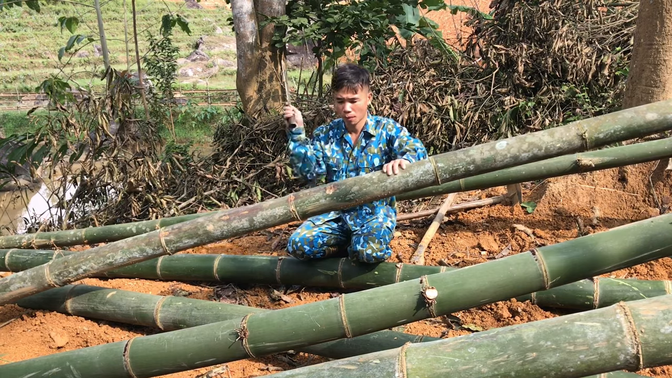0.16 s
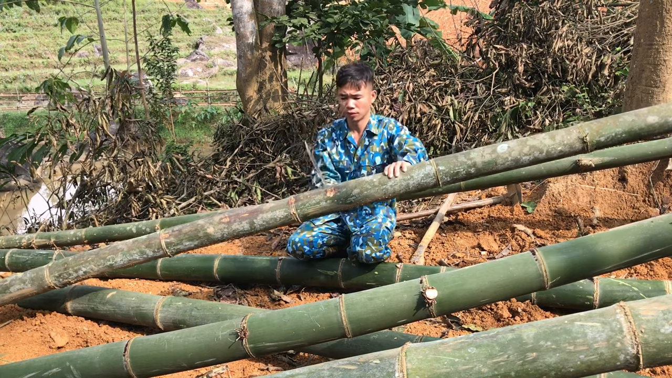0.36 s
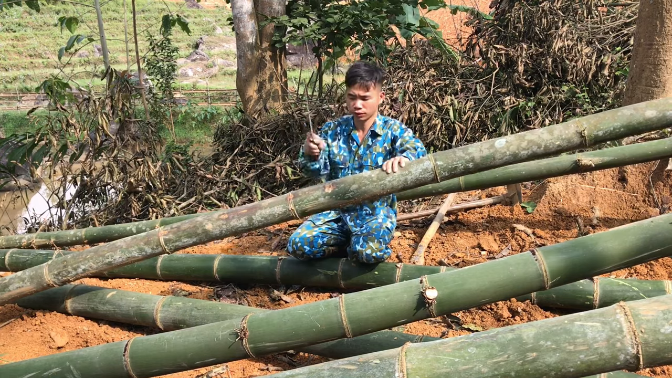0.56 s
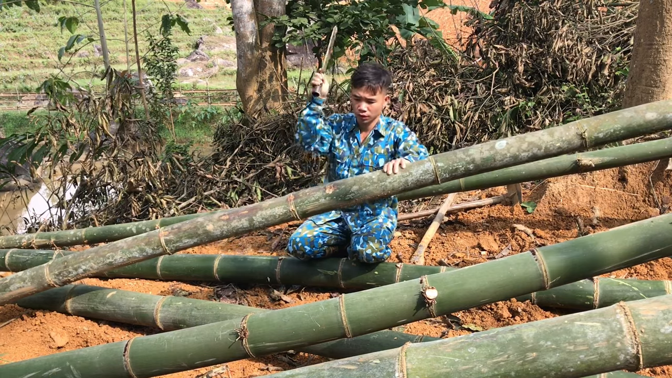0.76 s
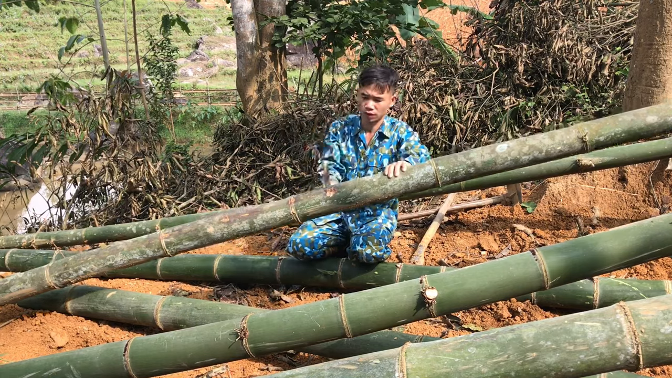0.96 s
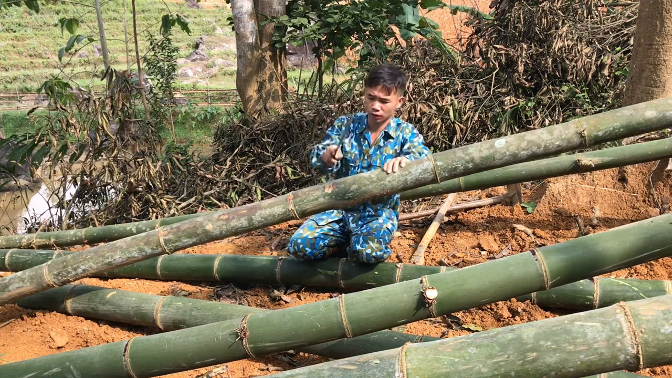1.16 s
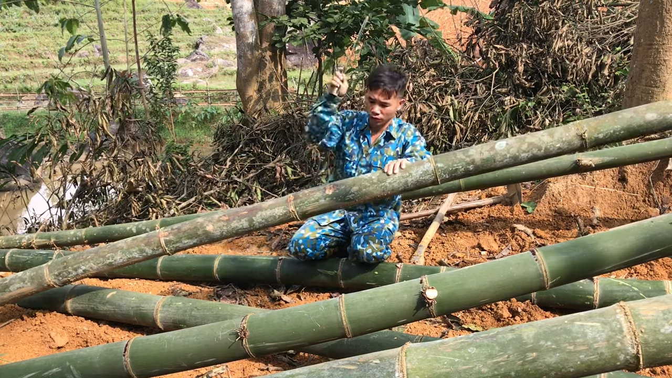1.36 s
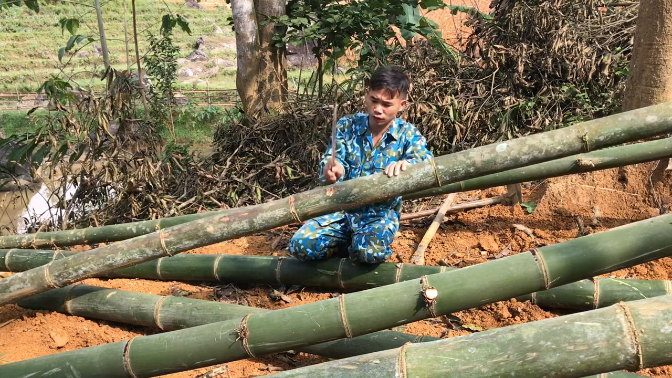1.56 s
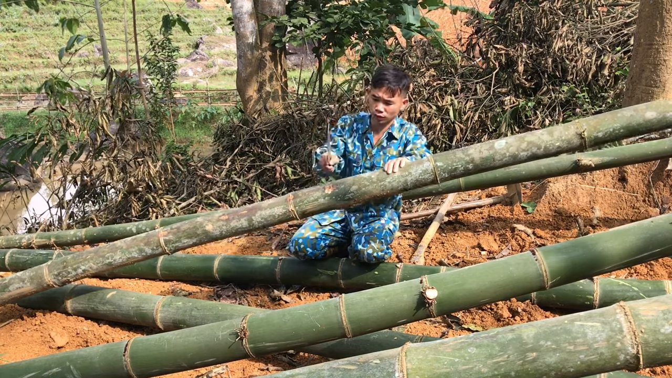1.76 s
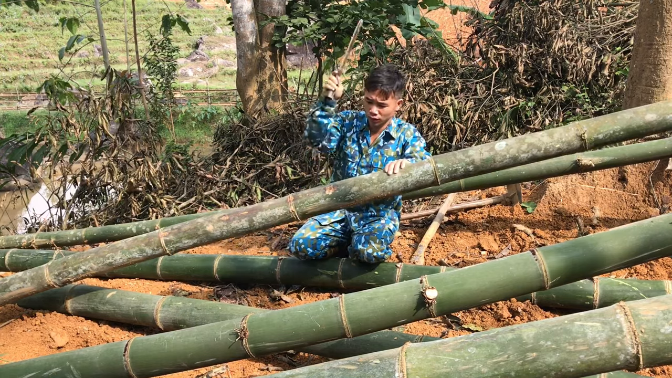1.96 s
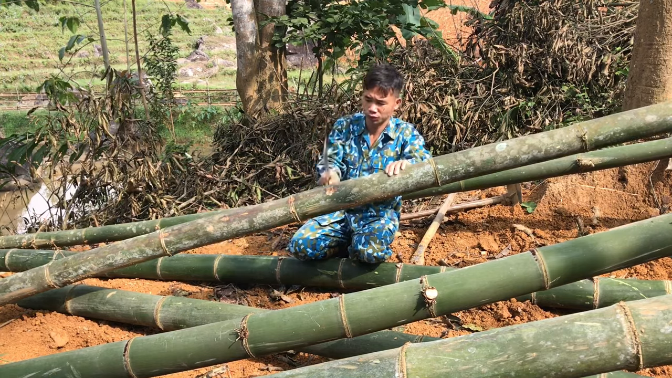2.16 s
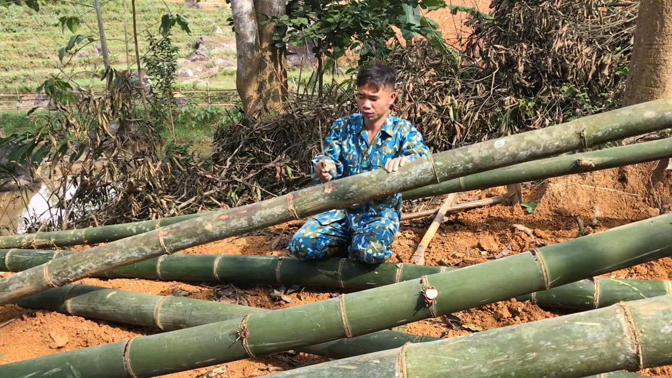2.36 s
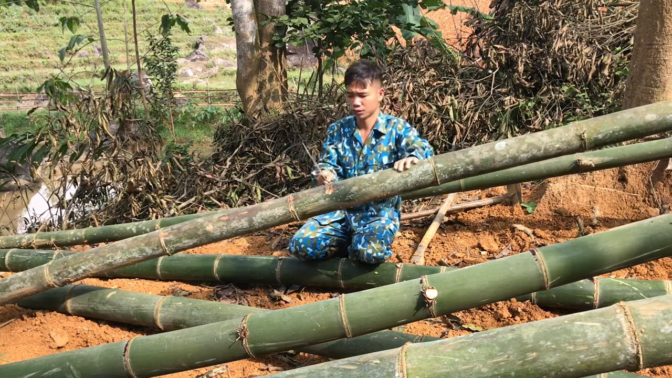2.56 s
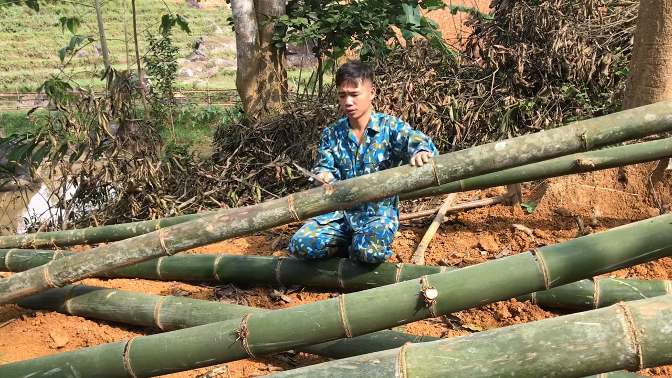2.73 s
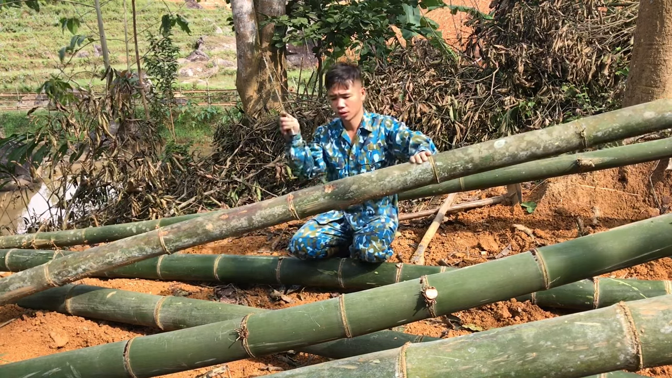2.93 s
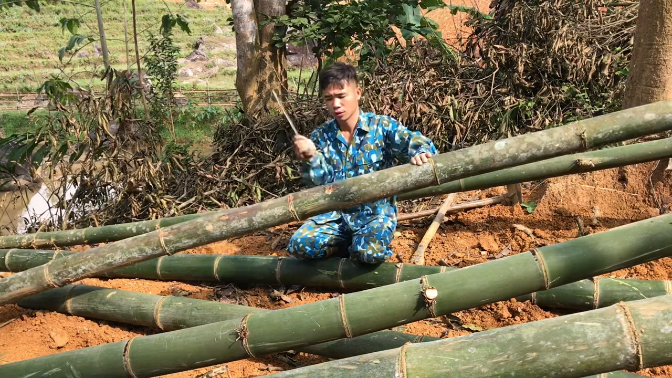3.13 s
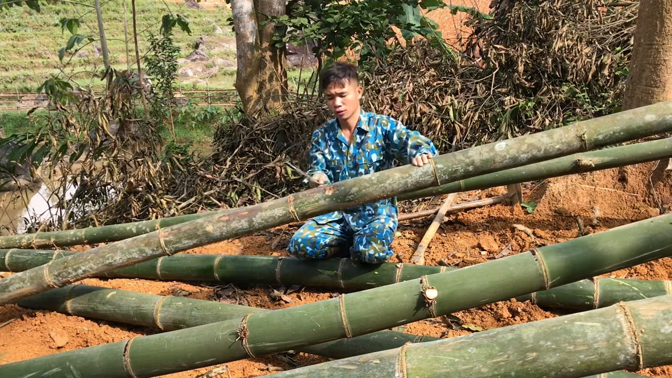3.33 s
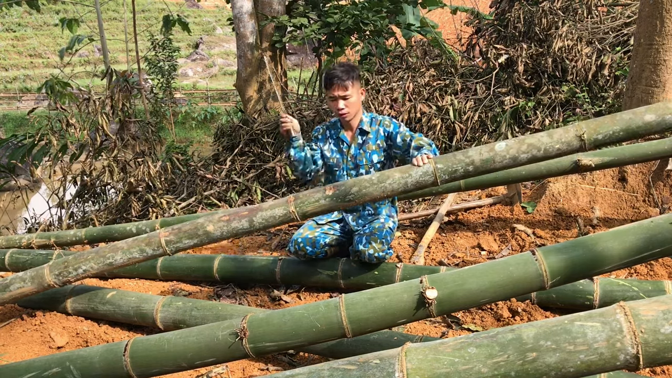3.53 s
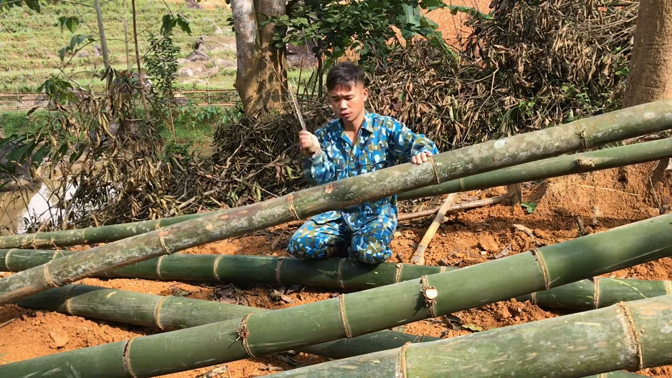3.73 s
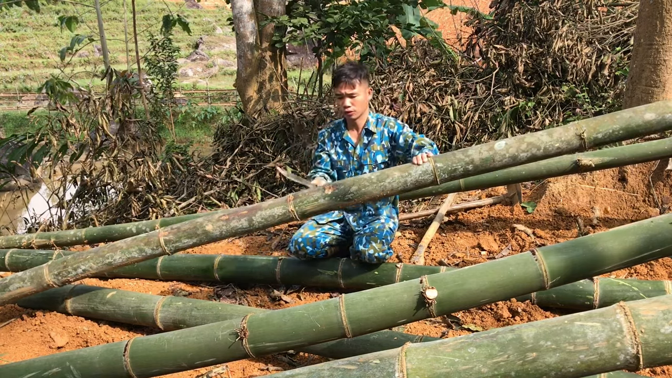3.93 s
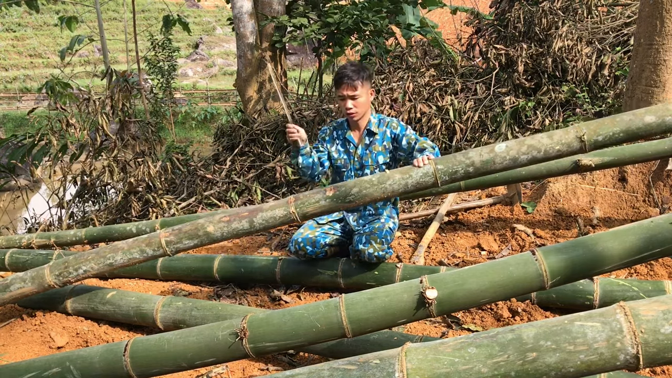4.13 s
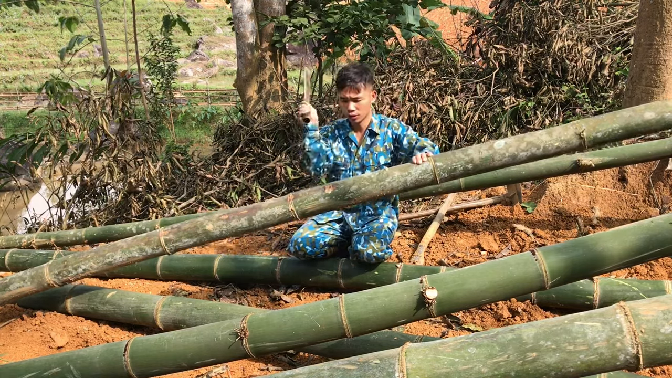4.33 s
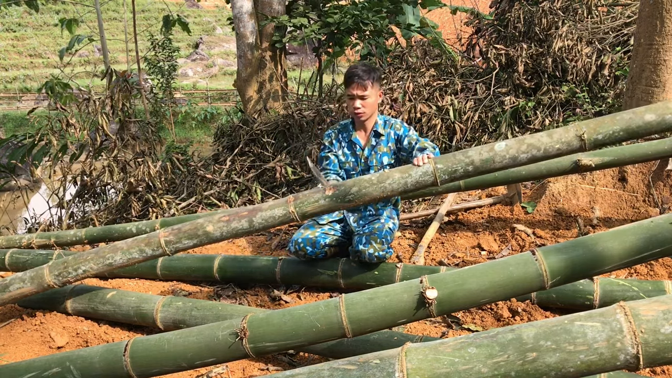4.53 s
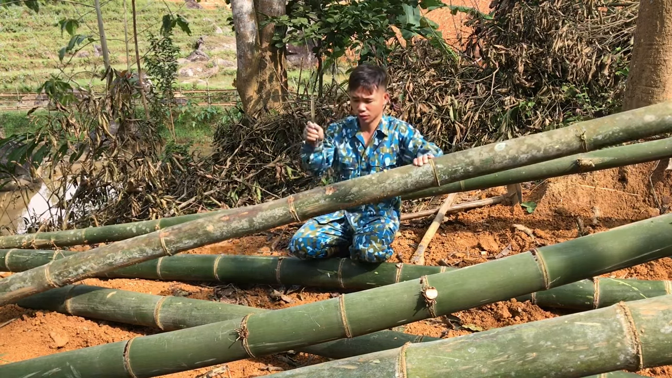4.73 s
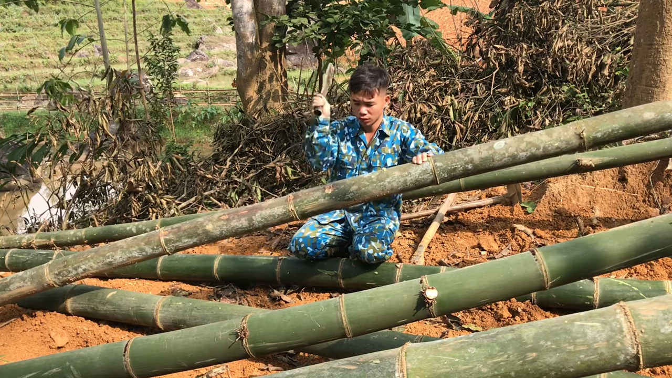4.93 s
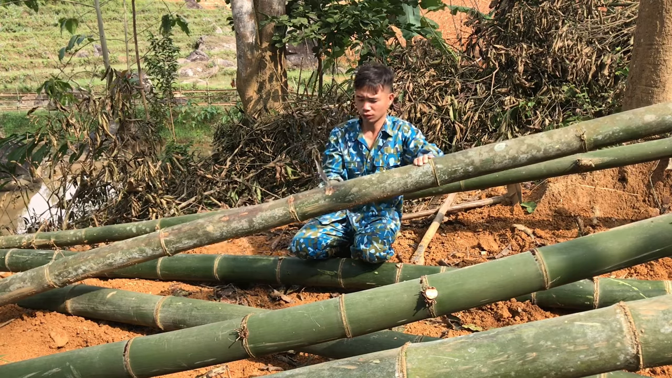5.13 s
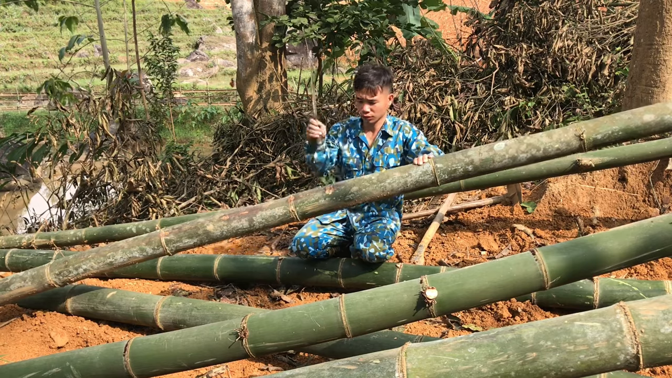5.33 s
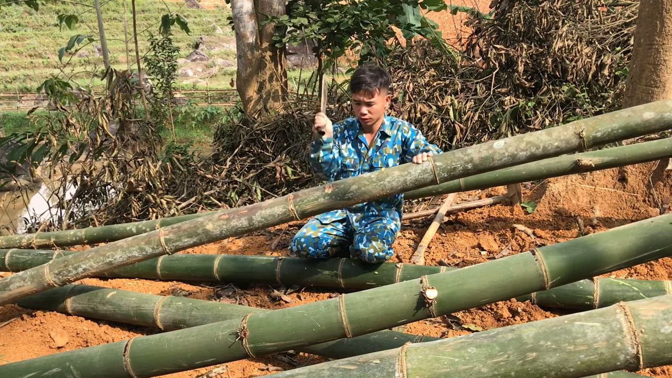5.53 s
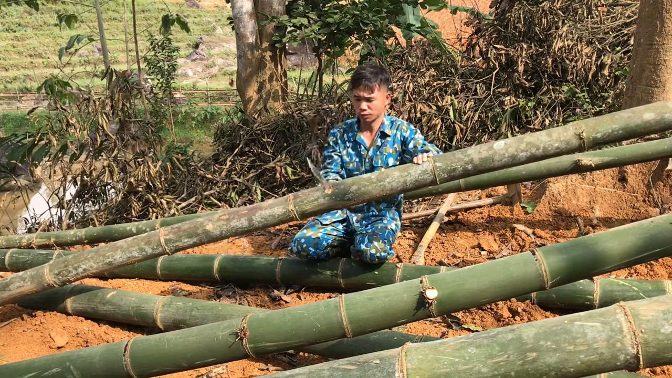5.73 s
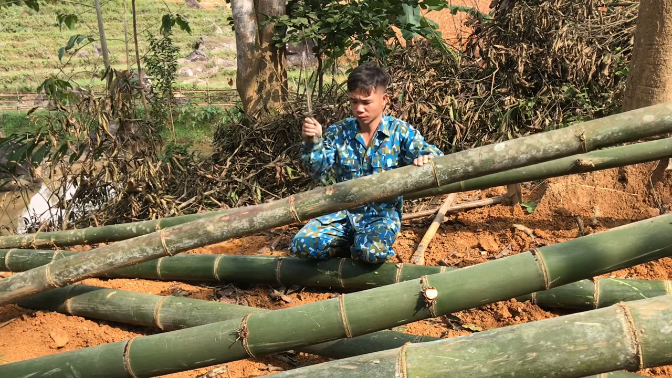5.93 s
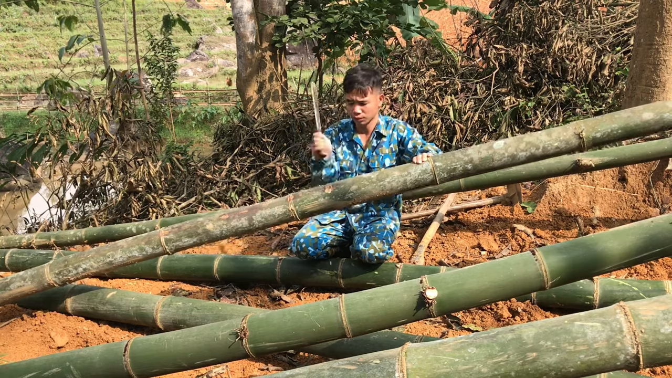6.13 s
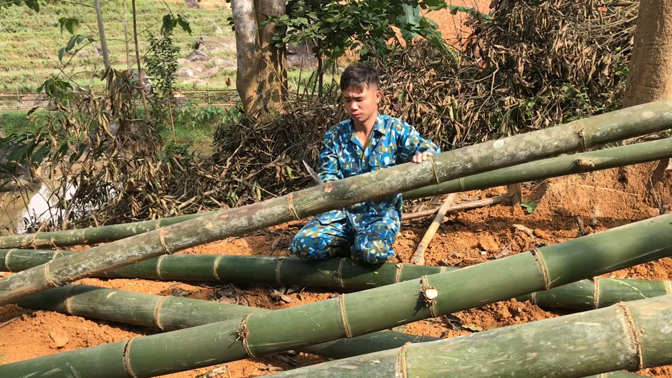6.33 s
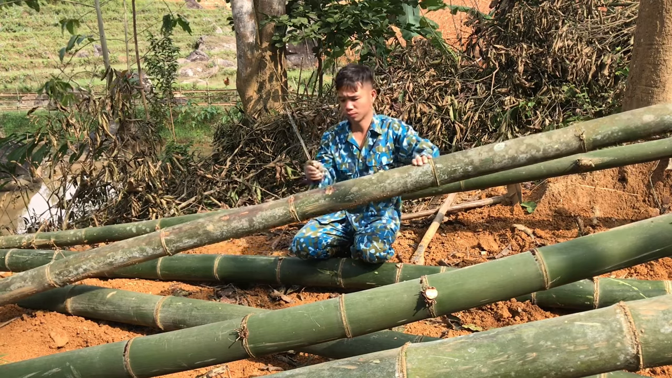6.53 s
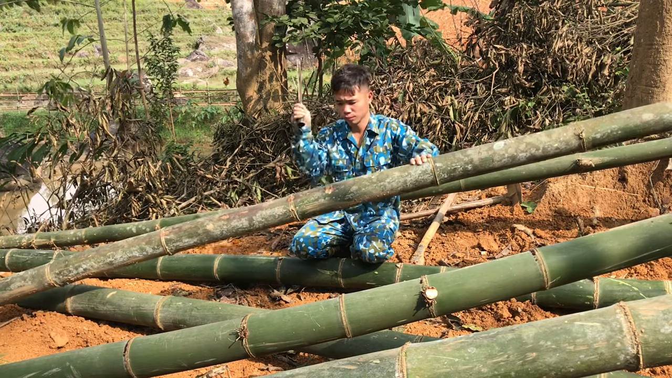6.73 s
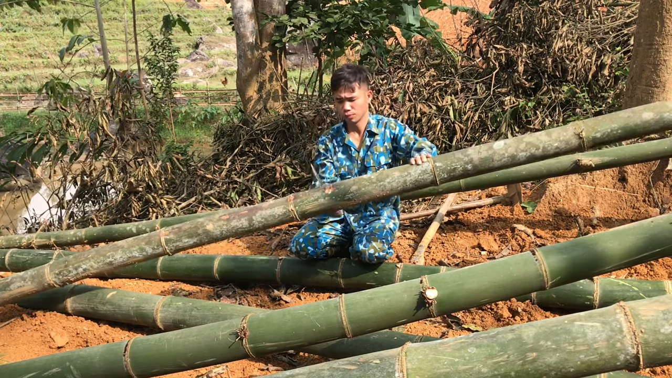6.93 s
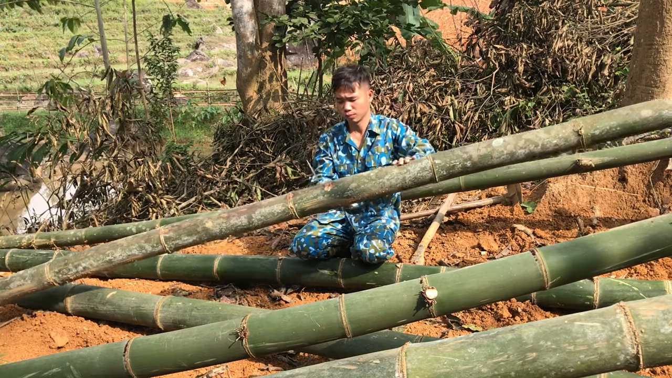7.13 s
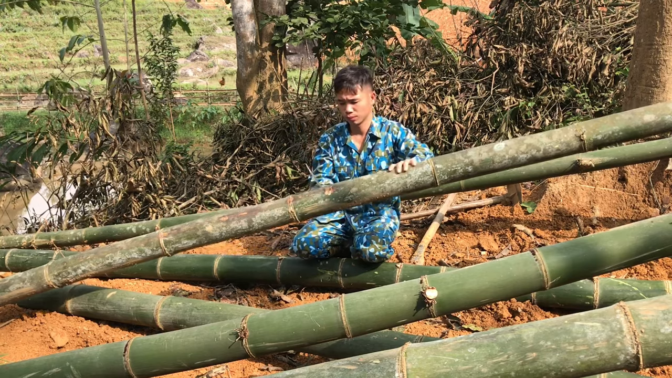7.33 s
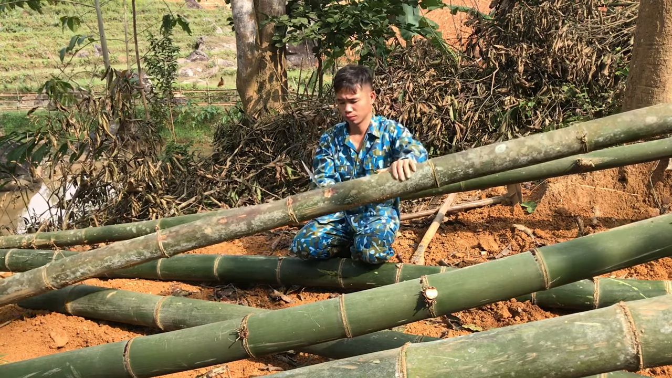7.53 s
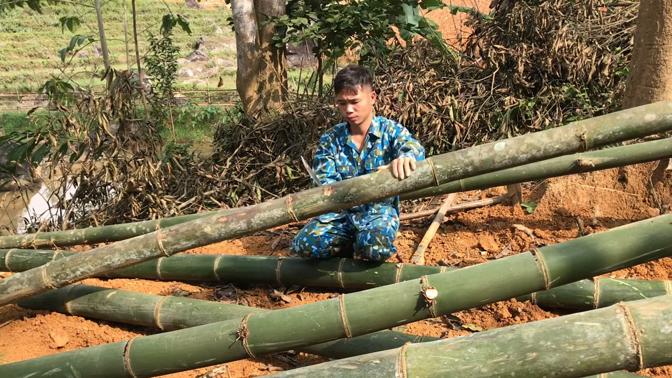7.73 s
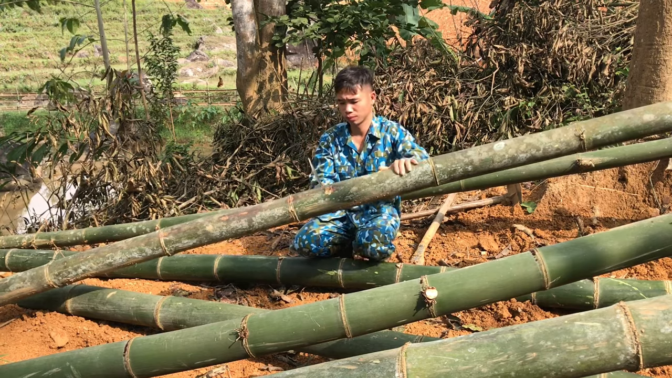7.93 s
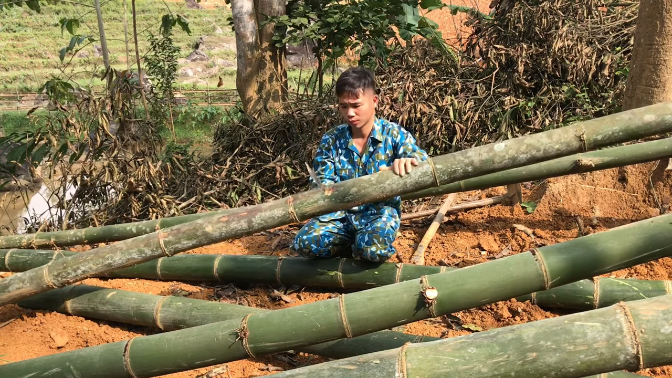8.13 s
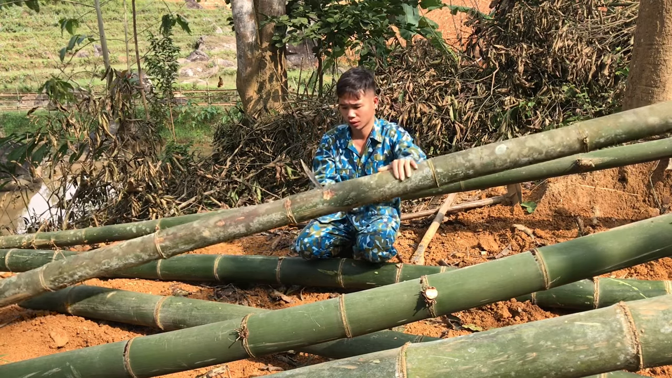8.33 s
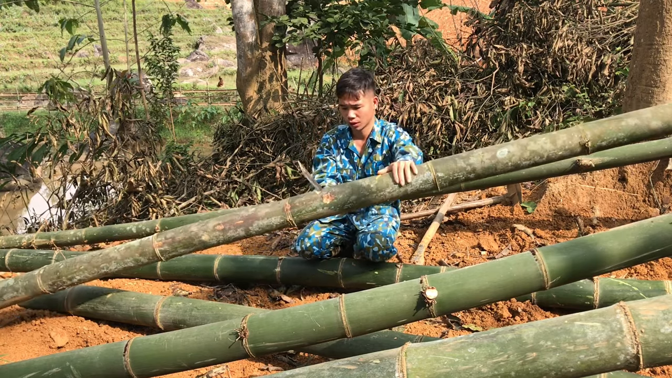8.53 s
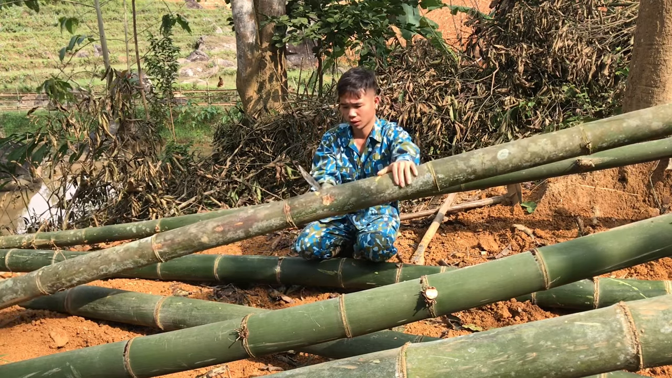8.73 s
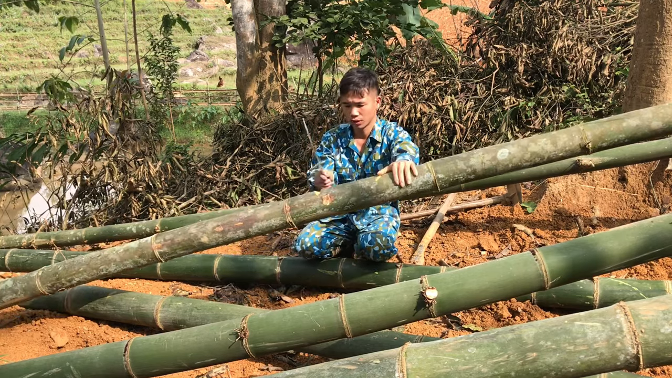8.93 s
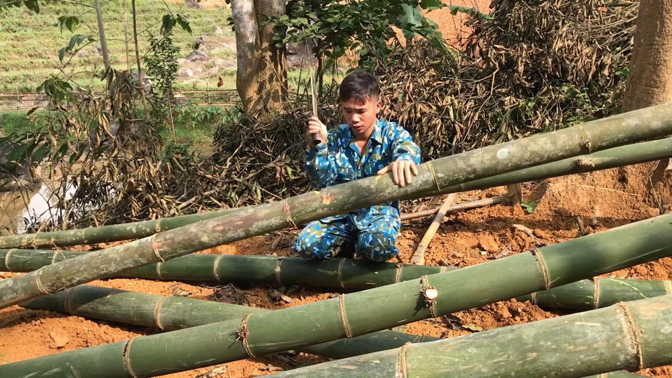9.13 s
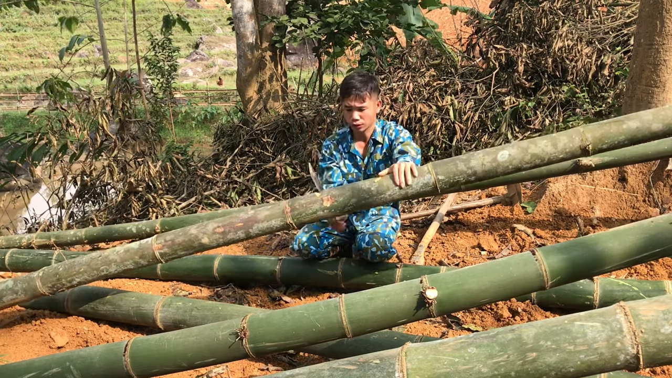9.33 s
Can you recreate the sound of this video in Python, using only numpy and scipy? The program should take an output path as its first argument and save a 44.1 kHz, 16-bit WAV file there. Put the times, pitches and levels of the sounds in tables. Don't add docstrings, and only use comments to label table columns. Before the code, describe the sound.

Loud, hollow blade blows on green bamboo, about two every second and a quarter, echo off a pile and hillsides; a quiet lull precedes one last chop.

```python
import sys
import numpy as np
from scipy import signal
from scipy.fft import rfft, irfft
from scipy.io import wavfile
from scipy.ndimage import uniform_filter1d, minimum_filter1d

SR = 44100
rng = np.random.default_rng(int(sys.argv[2]) if len(sys.argv) > 2 else 0)


def int16_out(signal):
    q = np.round(np.clip(np.atleast_2d(signal).T, -1, 1) * 32767)
    wavfile.write(sys.argv[1], SR, q.astype(np.int16))


def boost(x):
    u = np.asarray(x, float) / 20
    return 10 ** u


N = 413658
LEAD = SR // 2

# f/Hz, level/dB, t60/s
POLE = [(69.4, -27.5, 0.45), (120, -11.5, 0.12), (162, -23.5, 0.16), (236, -1.5, 0.32), (370, -2.5, 0.2),
        (432, -3.5, 0.2), (507, -1, 0.072), (569, -5.5, 0.12), (666, -10.5, 0.053), (682.2, 4, .12),
        (730.4, -9.5, 0.36), (804, -5, 0.12), (911, -6, 0.17), (980, 5.5, 0.044), (1128, -13, 0.18),
        (1088, 6.5, 0.033), (1226, 4, 0.05), (1321, 1, 0.073), (1420, -5, 0.089), (1538, -11.5, .09),
        (1626, -12.5, 0.1), (1654, -17.5, .09), (1768, -18.5, 0.064)]
# f/Hz, t60/s
PILE = [(100, 0.18), (400, 0.23), (1300, 0.19), (3000, 0.34), (6000, 0.14), (11000, 0.23), (16000, .15)]


def evened(x):
    return x / np.sqrt(np.mean(x ** 2) + 1e-20)


def read(points, hz):
    f, value = np.transpose(points)
    return np.interp(np.log(hz + 1), np.log(f + 1), value)


def add(mix, s, sound):
    part = mix[LEAD + round(s * SR):][:len(sound)]
    part += sound[:len(part)]


def band(x, lo_hz, hi_hz):
    edges_hz = [lo_hz, min(hi_hz, SR / 2 - 500)]
    return signal.sosfilt(signal.butter(2, edges_hz, "band", fs=SR, output="sos"), x)


def high_pass(x, hz):
    return signal.sosfilt(signal.butter(3, hz, "high", fs=SR, output="sos"), x)


def bump(hz, centre_hz, octaves):
    return np.exp(-.5 * (np.log2(hz / centre_hz) / octaves) ** 2)


def ring(modes, t, longer, colour_db=0):
    hz, db, t60 = np.transpose(modes)[:, :, None]
    level = boost(db + colour_db - 60 * t / (t60 * longer))
    return (level * np.sin(2 * np.pi * hz * t)).sum(0)


def burst(shape):
    x = rng.standard_normal(len(shape)) * shape
    for _ in range(6):
        spectrum = rfft(x)
        x = irfft(spectrum / (abs(spectrum) + 1e-12), len(x))
        x = x * shape / np.sqrt(uniform_filter1d(x ** 2, size=31) + 1e-9)
    return x / np.linalg.norm(x)


def space(decay, start_s, rise_s, colour=((1, 0), (2, 0)), size=SR // 2):
    hz, t, z = signal.stft(rng.standard_normal(size), SR, nperseg=256)
    age = np.maximum(t - start_s, 0)
    level_db = read(colour, hz)[:, None] - 60 * age / read(decay, hz)[:, None]
    z = z * boost(level_db) * (1 - np.exp(-age / rise_s))
    tail = signal.istft(z, SR, nperseg=256)[1]
    return tail / np.linalg.norm(tail)


def stirred(strength_db, spot, notch, thud_hz):
    # f/Hz, level/dB
    families = [(228, -23), (385, -21.5), (540, -18), (685, -10.5), (940, -16), (1100, -19), (1345, -13),
                (1680, -20)]
    joint_hz, joint_octaves = 682, .14
    hz = np.transpose(POLE)[0]
    tone_db, octave_db = 20 * np.log10(abs(np.sin(np.pi * spot * np.arange(1, 3))) + .05)
    vent_db = -18 * notch ** 2
    joint_db = (tone_db + vent_db) * bump(hz, joint_hz, joint_octaves)
    joint_db += octave_db * bump(hz, 2 * joint_hz, joint_octaves)
    if thud_hz:
        low_db = 17 * bump(hz, thud_hz, 0.45)
    else:
        low_db = 16.5 * notch * bump(hz, 399.2, 0.86)
    chance_db = 2.64 * rng.standard_normal(len(hz))
    colour_db = strength_db + read(families, hz) + joint_db + low_db + chance_db
    return colour_db[:, None], tone_db


def pole_ring(strength_db, colour_db, longer, wedge_s):
    # f/Hz, level/dB, t60/s
    neighbour = [(1294, -25, .35), (1370, -27, 0.26), (690, -37.5, .4)]
    t = np.arange(SR // 2) / SR
    wedge = t[:1500] / wedge_s
    jolts = burst(wedge ** 2 * np.exp(-wedge))
    pole = signal.fftconvolve(boost(5) * ring(POLE, t[:SR // 4], 1.41 * longer, colour_db), jolts)
    pole = np.pad(pole, (0, SR // 4))
    pole *= np.exp(-(np.arange(len(pole)) / SR / 0.041) ** 2)
    return pole + signal.fftconvolve(boost(strength_db - 17) * ring(neighbour, t, 1), jolts)


def split_skin(crack_db, splinter_db, fibres_db, tear_db, longer):
    # f/Hz, level/dB, t60/s
    fibres = [(2260, -4.5, 0.023), (2495, -2, 0.095), (2440, -6.5, .05), (2466, -0.5, 0.059),
              (2740, 0, 0.1)]
    t = np.arange(SR // 2) / SR
    early = t[:1500]
    snap = np.exp(-early / .0011) + 0.14 * np.exp(-early / 0.02)
    splinter = np.exp(-early / 0.0057) + 0.23 * np.exp(-early / 0.0062)
    edge = signal.fftconvolve(boost(fibres_db - 10.5) * ring(fibres, t, .7 * longer), burst(snap))
    edge[:1500] += boost(crack_db + 22) * band(burst(snap), 8000, 18000)
    edge[:1500] += boost(splinter_db + 26.5) * band(burst(splinter), 1300, 7500)
    hiss = rng.standard_normal((2, len(t)))
    fading_db = -60 * t / .48
    edge[:len(t)] += boost(tear_db - 29.0 + fading_db) * band(hiss[0], 3200, 9800)
    edge[:len(t)] += boost(tear_db - 32.5 + 1.1 * fading_db) * band(hiss[1], 9000, 17000)
    return edge


def blade_ring(db):
    # f/Hz, level/dB, t60/s
    steel = [(3024, -3.5, 0.2), (3284, -3.5, .07), (3400, -11.5, 0.14)]
    t = np.arange(SR // 2) / SR
    ping = burst(np.exp(-t[:1500] / .002))
    return signal.fftconvolve(boost(db + 4.0) * ring(steel, t, .4 * 0.47), ping)


def pile_rattle(pole, edge, strength_db):
    rattle_db = 0.075 * min(strength_db + 16, 0)
    sent = boost(-10.5) * pole + boost(-11) * edge
    return boost(rattle_db) * signal.fftconvolve(sent, space(PILE, 0.00063, 0.00029))[:len(pole)]


def slope_echo(close):
    # f/Hz, t60/s
    slopes = [(100, 0.3), (400, 1), (1300, .9), (3000, 4.8), (6000, 0.27), (9000, 0.43), (12000, .3)]
    # f/Hz, level/dB
    slopes_colour = [(80, -4), (200, 5.5), (320, 15), (500, 10.5), (1300, 7.5), (2500, 3), (4500, 8),
                     (6000, 2), (9300, -6), (11000, -14), (16000, -24)]
    echoes = space(slopes, .165, .03, slopes_colour, size=SR)
    return boost(-42) * signal.fftconvolve(close, echoes)


def chop(s, strength_db, spot, crack_db, blade_db, thud_hz=0):
    bites = not thud_hz
    notch = bites * np.clip((s - 5.8) / 4.4, 0, 1)
    colour_db, tone_db = stirred(strength_db, spot, notch, thud_hz)
    full_splinter_db = -14
    if bites:
        longer, wedge_s = 0.47 + 0.14 * notch, .0033
        skin_db = -6.5 * np.exp(-s / 0.63)
        splinter_db = full_splinter_db + 0.16 * strength_db + skin_db
    else:
        longer, wedge_s = .55 * (400 / thud_hz) ** 2.2, 0.001
        splinter_db = crack_db - 8.5
    fibres_db = splinter_db - full_splinter_db - 12.5 + .7 * tone_db * bites
    tear_db = crack_db + 0.5 - 23.5 * notch
    pole = pole_ring(strength_db, colour_db, longer, wedge_s)
    edge = split_skin(crack_db, splinter_db, fibres_db, tear_db, longer)
    close = pole + edge + pile_rattle(pole, edge, strength_db)
    out = slope_echo(close)
    out[:len(close)] += close + blade_ring(blade_db)
    return s + 0.0006, out


def blows():
    # t/s, strength/dB, landing spot (0 node to 0.5 mid-joint), bite level/dB, blade ring level/dB
    swings = [(-.27, 5, 0.067, -8.5, -20), (0.3559, 1.5, 0.22, -11, -21), (.9802, 2.5, 0.039, -13.5, -12.5),
              (1.6057, -3.5, 0.31, -11, -14), (2.1966, 0, 0.25, -8.5, -10), (3.2066, 1, .09, -9, -15.5),
              (3.8125, 1.5, .13, -11.5, -3.5), (4.459, -0.5, 0.32, -13, -17), (5.0548, -2.5, .25, -9, -15),
              (5.6287, 0, 0.059, -6.5, -12.5), (6.2113, 0.5, .08, -14, -18.5),
              (6.9409, -1.5, 0.1, -15, -16.5), (9.3135, -5.5, 0.39, -14.5, -20)]
    mix = np.zeros(N + LEAD)
    for swing in swings:
        add(mix, *chop(*swing))
    return mix


def engine():
    # t/s, level/dB
    loudness = [
        (0, -70.5),
        (2.901, -69.5),
        (5.001, -67.5),
        (7.4, -67),
        (8.699, -66.5),
        (9.4, -69.5),
    ]
    s, db = np.transpose(loudness)
    t = np.arange(N) / SR
    firings_per_s, uneven_db = 25.3, 3.5
    fired = np.diff(np.floor(firings_per_s * t), prepend=0)
    pipe = [(52.92, -16.5, 0.34), (140, 0, 0.027), (200, -3.5, 0.023)]  # f/Hz, level/dB, t60/s
    thump = ring(pipe, t[:SR // 4], 0.87)
    puffs = signal.oaconvolve(fired * boost(uneven_db * rng.standard_normal(N)), thump)[:N]
    return boost(np.interp(t, s, db) + 0.5) * evened(puffs)


def air():
    # f/Hz, level/dB per Hz
    hush = [(15, -41), (25, -22), (90, -6), (142, -3.5), (208, -6), (280, -6), (553, -14), (1010, -9.5),
            (1980, -19), (4360, -18), (10400, -26.5), (15200, -21.5), (16500, -44)]
    hz = np.fft.rfftfreq(1024, 1 / SR)
    a, b, patches = rng.standard_normal((N // 256 + 5, 513, 3)).T
    patches = evened(uniform_filter1d(uniform_filter1d(patches, 14, 0), 16, 1))
    z = (a + 1j * b) * boost(read(hush, hz)[:, None] + 0.5 * patches)
    return boost(-66.5) * evened(signal.istft(z, nperseg=1024, noverlap=768)[1][:N])


def circuit_whine():
    return boost(-92.0) * np.sin(2 * np.pi * 12570 * np.arange(N) / SR)


def chicks():
    # t/s, length/s, start f/Hz, end f/Hz, level/dB
    peeps = [(.297, .03, 4600, 3120, -63), (.89, .04, 4800, 3500, -75), (2.82, .025, 6000, 3040, -78.5),
             (2.95, .04, 3400, 2690, -75), (2.053, 0.03, 3240, 2940, -74), (4.95, .06, 4970, 3240, -74),
             (4.2, .016, 6710, 3800, -72), (4.337, .013, 3405, 3000, -73.5), (8.04, .05, 4600, 3000, -79),
             (8.39, .06, 4400, 2750, -73), (8.46, .11, 5360, 3900, -77.5), (8.7, 0.14, 5455, 3130, -72.5),
             (8.97, .1, 5300, 3900, -75.5), (9.015, .05, 3500, 2500, -74.5)]
    mix = np.zeros(N + LEAD)
    for s, length, start_hz, end_hz, db in peeps:
        glide = np.linspace(0, 1, round(length * SR)) ** 1.6
        hz = start_hz + (end_hz - start_hz) * glide
        waver = evened(uniform_filter1d(rng.standard_normal(SR // 4), 120))[:len(hz)]
        voice = np.sin(2 * np.pi * np.cumsum(hz + 120 * waver) / SR)
        add(mix, s, boost(db) * voice * signal.windows.tukey(len(hz), .6))
    blur = signal.fftconvolve(mix, space(PILE, 0.005, .01))[:len(mix)]
    return 0.87 * mix + 0.49 * blur


def cricket():
    # t/s, length/s
    trills = [
        (.78, 0.074),
        (2.798, .06),
        (2.974, 0.076),
        (6.767, 0.1),
        (8.08, 0.032),
        (8.44, .06),
        (8.773, 0.044),
        (9.1, 0.11),
    ]
    mix = np.zeros(N + LEAD)
    for s, length in trills:
        t = np.arange(0, length, 1 / SR)
        wings = np.sin(2 * np.pi * 5150 * t) + 0.7 * np.sin(2 * np.pi * 5310 * t)
        add(mix, s, boost(-79.5) * np.sin(np.pi * 62 * t) ** 4 * wings)
    return mix


def fibre_ticks():
    # t/s, peak level/dB, pitch f/Hz
    snaps = [(1.4705, -59.5, 4000), (1.9294, -50, 2940), (4.1654, -52, 15000), (4.3525, -54, 11000),
             (4.8578, -52, 4480), (4.933, -53, 4000), (5.4395, -52, 5420), (5.4877, -55, 8900),
             (5.4984, -54, 15000), (5.5273, -52, 14060), (5.5404, -47, 2960), (5.9887, -52.5, 3920),
             (6.0467, -63, 7000), (6.5394, -64, 7900), (6.581, -50, 11000), (6.6112, -42.5, 4100),
             (6.677, -54.5, 5150), (6.744, -64, 3980), (6.7924, -61, 4470), (6.868, -64.5, 7900),
             (7.3594, -51, 2800), (7.7445, -60, 4000), (7.8108, -50, 2500), (8.176, -56, 4500),
             (8.619, -62.5, 8000), (8.751, -57, 3500)]
    mix = np.zeros(N + LEAD)
    fade = np.exp(-np.arange(400) / SR / 0.0018)
    for s, db, hz in snaps:
        snap = boost(db + 17.5) * burst(fade)
        tick = np.zeros(len(snap))
        for lo_hz, hi_hz in [(2200, 3600), (4300, 9000), (10500, 16500)]:
            weight = 0.35 + bump((lo_hz + hi_hz) / 2, hz, 0.47)
            tick += weight * band(band(snap, lo_hz, hi_hz), lo_hz, hi_hz)
        add(mix, s, tick)
    return mix


def rubs():
    # t/s, length/s, level/dB
    strokes = [
        (2.421, 0.36, -65),
        (4.336, 0.092, -67),
        (7.043, 0.26, -69.5),
        (7.346, .2, -68),
        (7.599, 0.37, -77),
    ]
    mix = np.zeros(N + LEAD)
    for s, length, db in strokes:
        swell = np.sin(np.pi * np.arange(0, length, 1 / SR) / length)
        grains = uniform_filter1d(rng.standard_normal(SR), 150)[:len(swell)]
        hiss = evened(band(rng.standard_normal(SR), 6600, 15700))[:len(swell)]
        add(mix, s, boost(db + 2.0 * evened(grains)) * swell * hiss)
    return mix


def knocks():
    # t/s, strength/dB, landing spot (0 node to 0.5 mid-joint), click level/dB, thud f/Hz
    taps = [
        (2.6507, -31, .47, -41.5, 260),
        (8.3636, -45.5, 0.044, -54, 510),
        (8.5625, -36.5, 0.085, -44, 353),
    ]
    mix = np.zeros(N + LEAD)
    for s, strength_db, spot, click_db, thud_hz in taps:
        blade_db = click_db - 50 * (.5 - spot)
        add(mix, *chop(s, strength_db, spot, click_db, blade_db, thud_hz))
    return mix


def mic_port(near):
    # f/Hz, level/dB
    port = [(300, -4), (6000, 7.5), (8000, 2.5), (9500, 1.5), (10500, -4.5), (11500, 2), (13000, 2),
            (15300, 1.5)]
    hz = np.fft.rfftfreq(len(near), 1 / SR)
    near = irfft(rfft(near) * boost(read(port, hz)), len(near))
    return high_pass(near, 120)


def scene():
    near = mic_port(blows() + chicks() + cricket() + fibre_ticks() + rubs() + knocks())
    far = high_pass(engine() + air(), 40) + circuit_whine()
    return (near[LEAD:] + far)[None]


def roll_off(x):
    return signal.sosfilt(signal.butter(12, 17100, fs=SR, output="sos"), x)


def record(dry):
    room = minimum_filter1d(np.minimum(0.64 / (abs(dry) + 1e-9), 1), size=161, axis=1)
    x = dry * uniform_filter1d(room, size=161, axis=1)
    lead_in = boost(-38) * np.roll(x, -1024, 1) + boost(-44) * np.roll(x, -512, 1)
    lead_in[:, -1024:] = 0
    ahead = np.arange(800) / SR
    thin_tone = boost(-1500 * ahead) * np.cos(2 * np.pi * 3050 * ahead)
    early = signal.oaconvolve(x[:, ::-1], thin_tone[None], axes=1)[:, :N][:, ::-1]
    x = x + boost(-3.0) * lead_in + boost(-57) * early
    low_pass = signal.firwin(255, 15900, window=("kaiser", 6), fs=SR)
    mix = signal.oaconvolve(x, low_pass[None], "same")
    return roll_off(mix)


dry = scene()
out = record(dry)
int16_out(out)
```